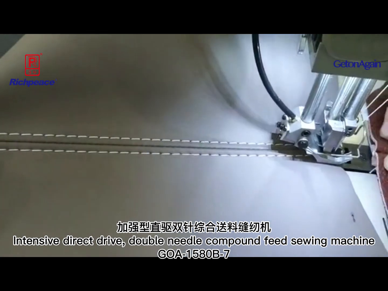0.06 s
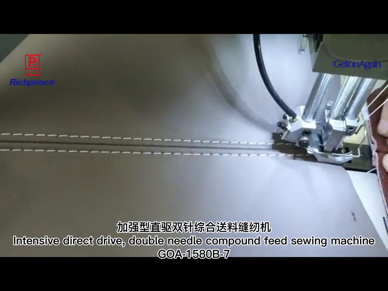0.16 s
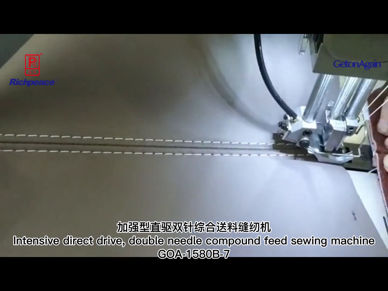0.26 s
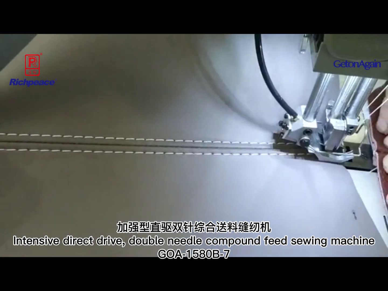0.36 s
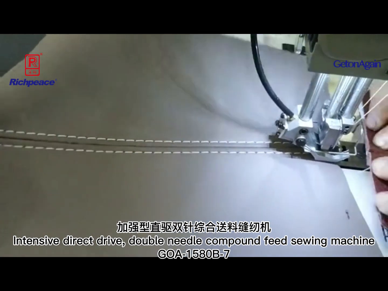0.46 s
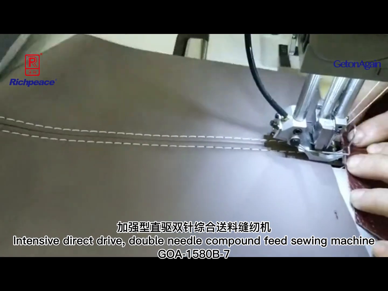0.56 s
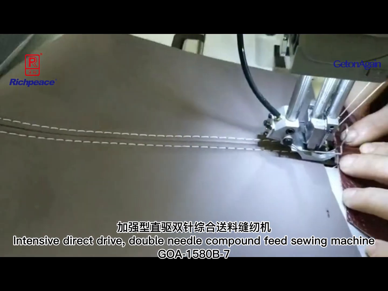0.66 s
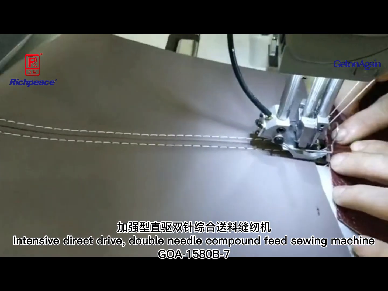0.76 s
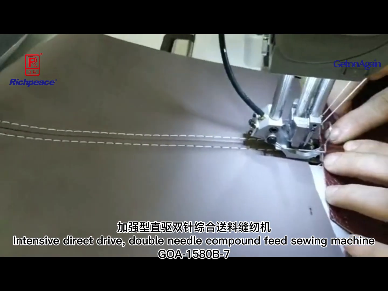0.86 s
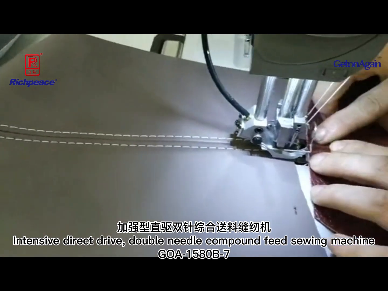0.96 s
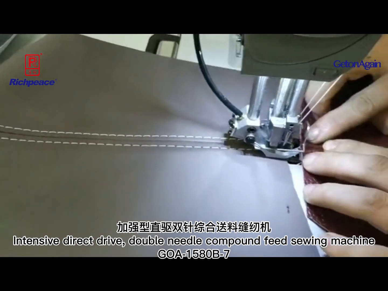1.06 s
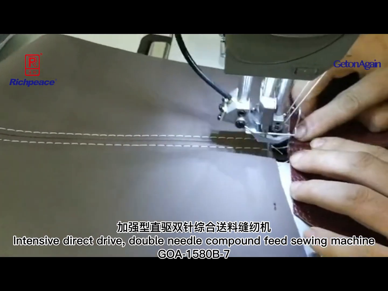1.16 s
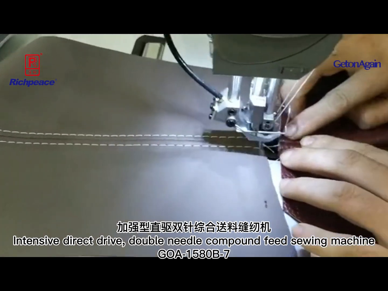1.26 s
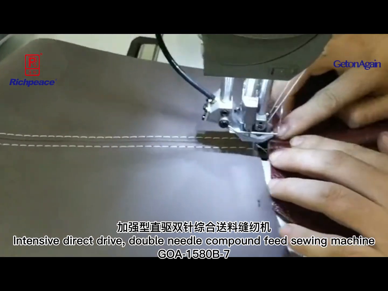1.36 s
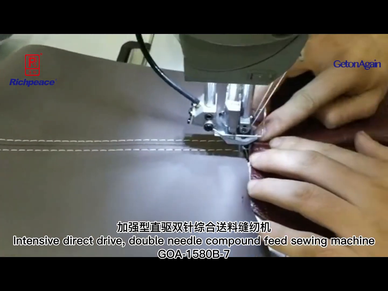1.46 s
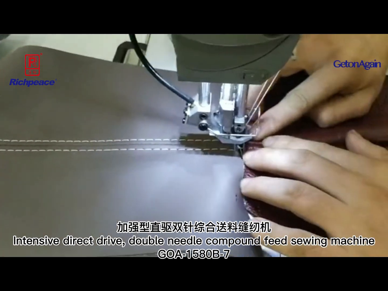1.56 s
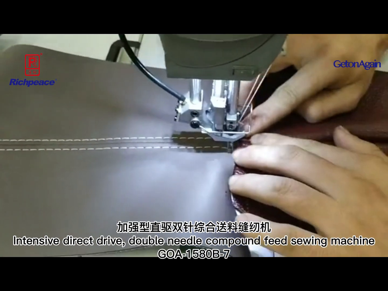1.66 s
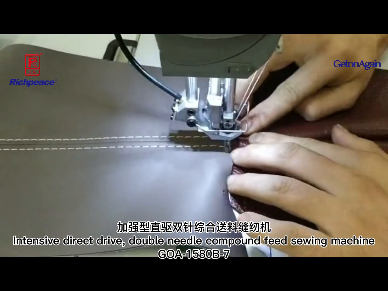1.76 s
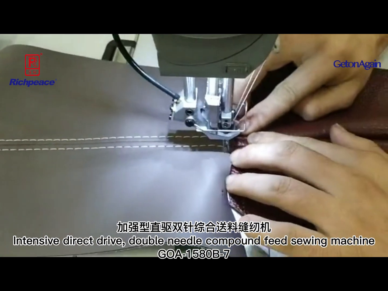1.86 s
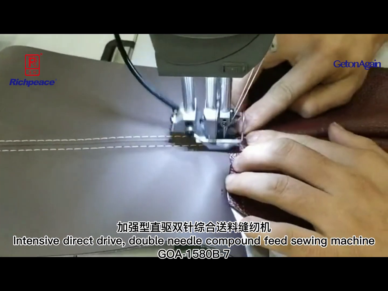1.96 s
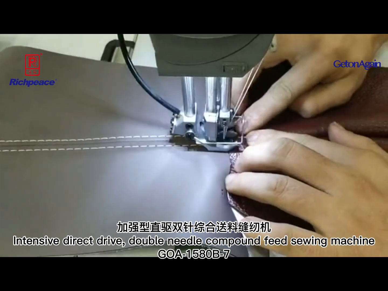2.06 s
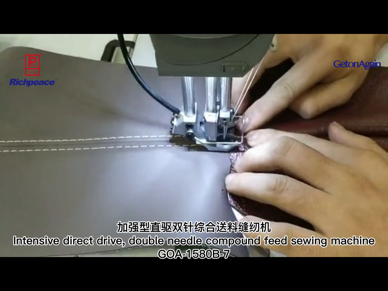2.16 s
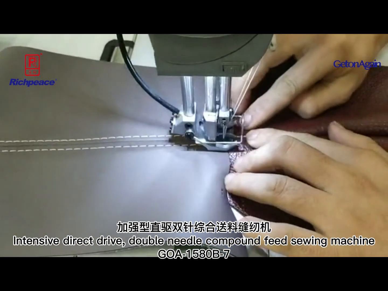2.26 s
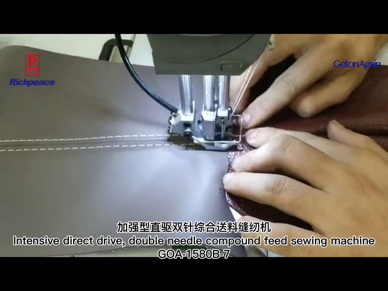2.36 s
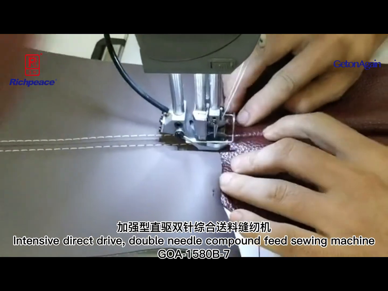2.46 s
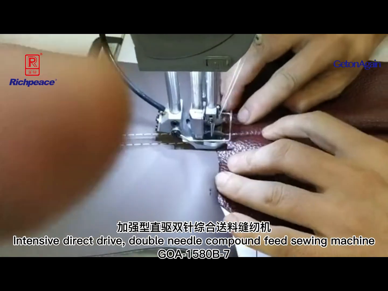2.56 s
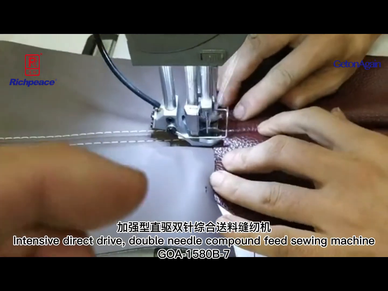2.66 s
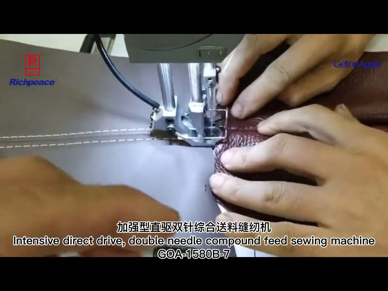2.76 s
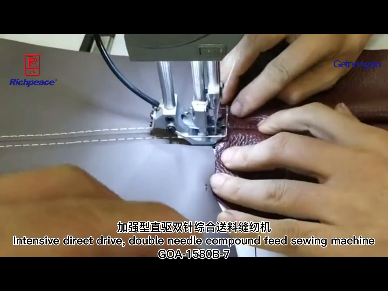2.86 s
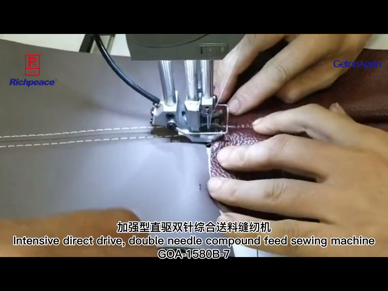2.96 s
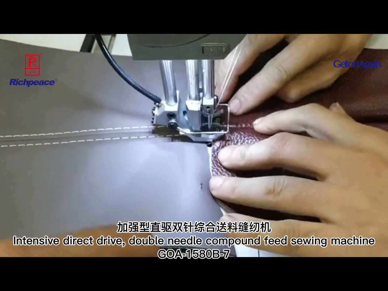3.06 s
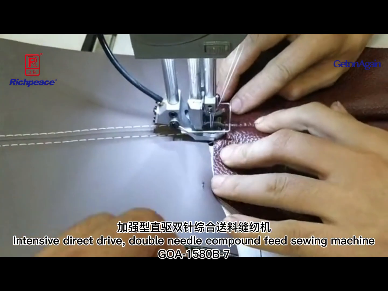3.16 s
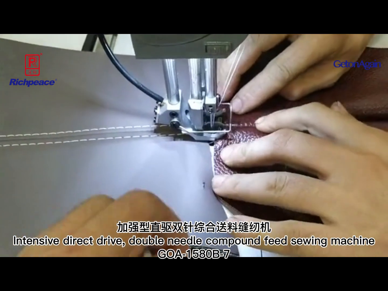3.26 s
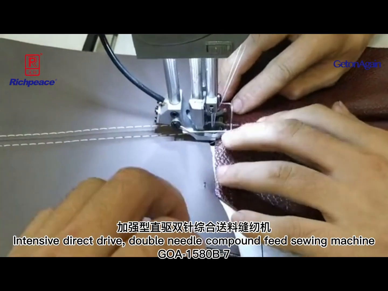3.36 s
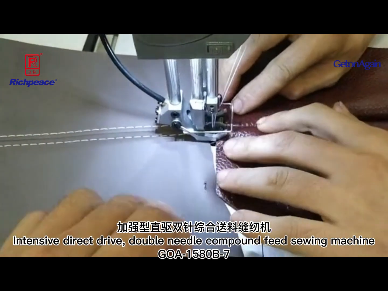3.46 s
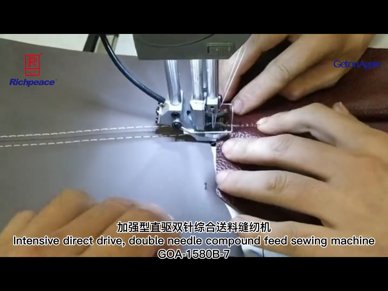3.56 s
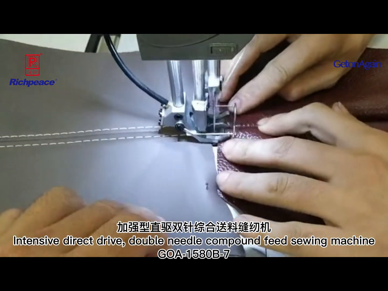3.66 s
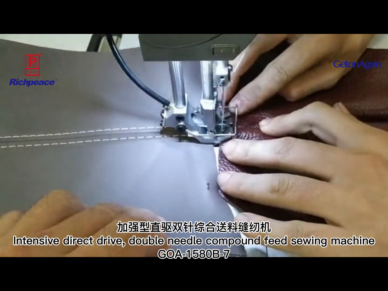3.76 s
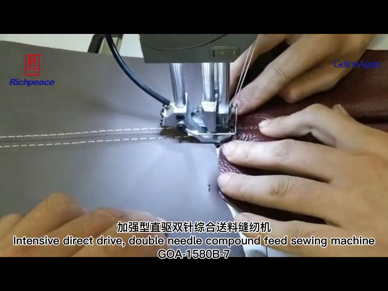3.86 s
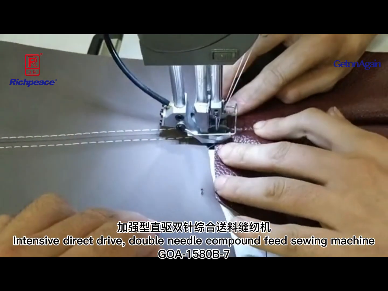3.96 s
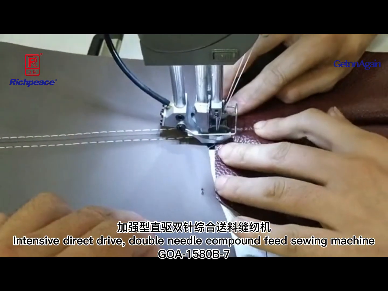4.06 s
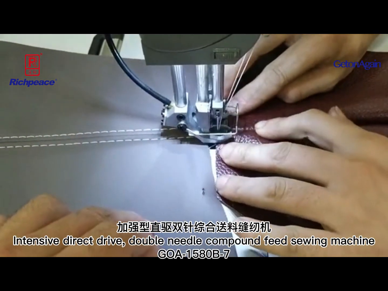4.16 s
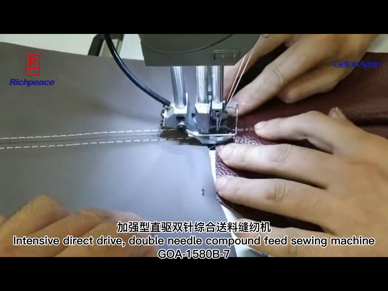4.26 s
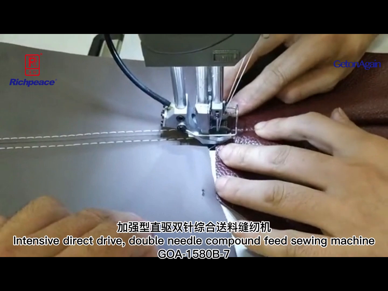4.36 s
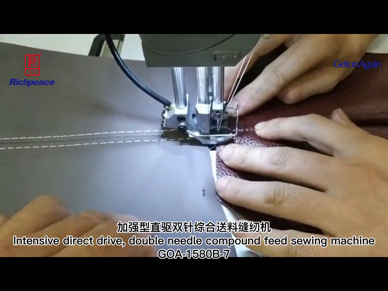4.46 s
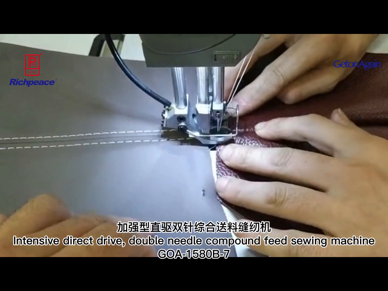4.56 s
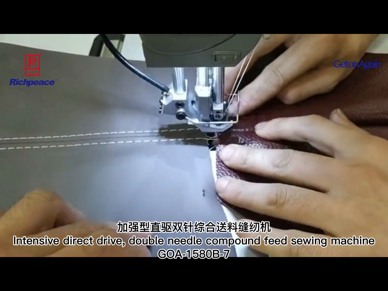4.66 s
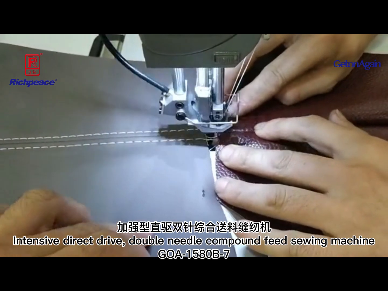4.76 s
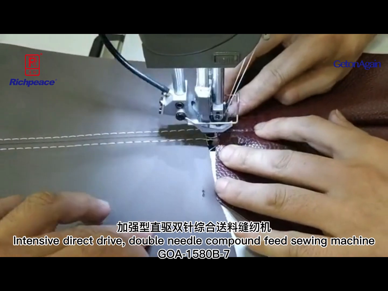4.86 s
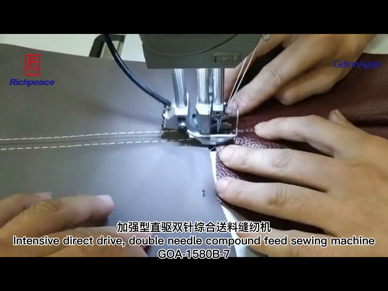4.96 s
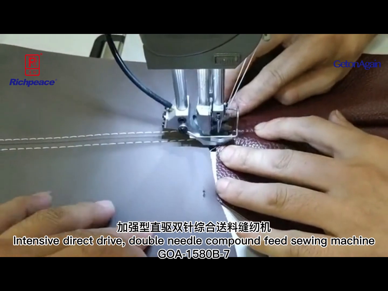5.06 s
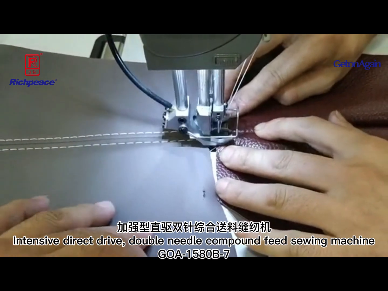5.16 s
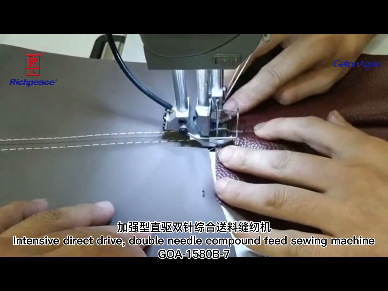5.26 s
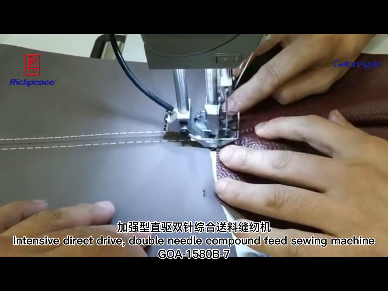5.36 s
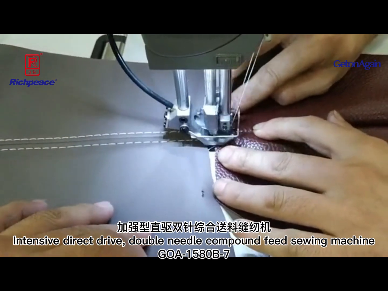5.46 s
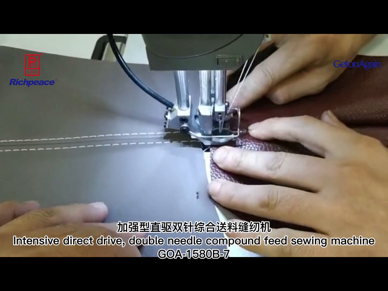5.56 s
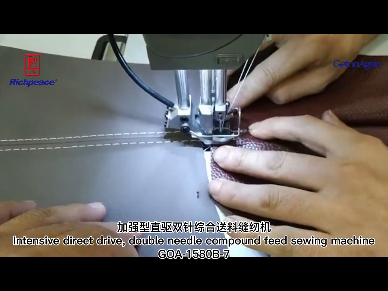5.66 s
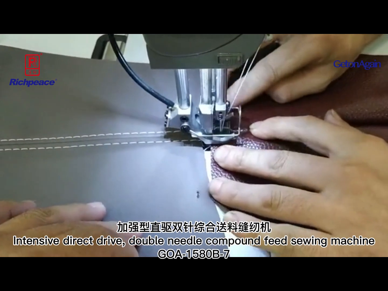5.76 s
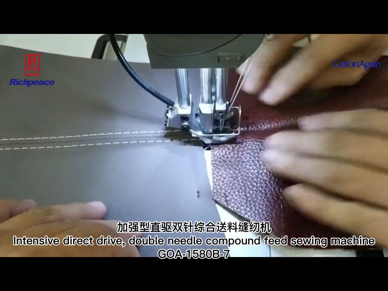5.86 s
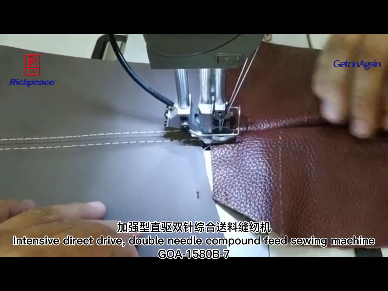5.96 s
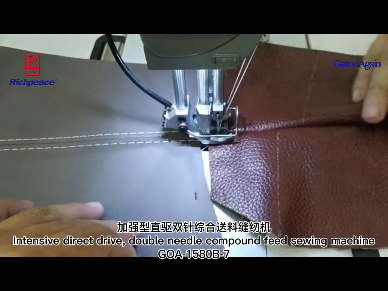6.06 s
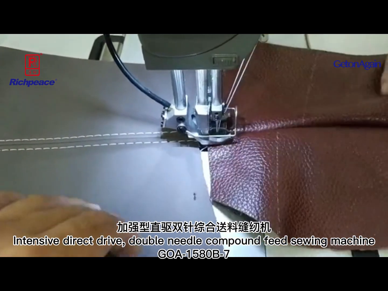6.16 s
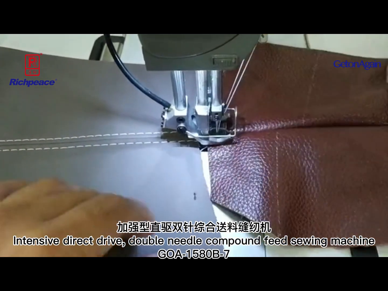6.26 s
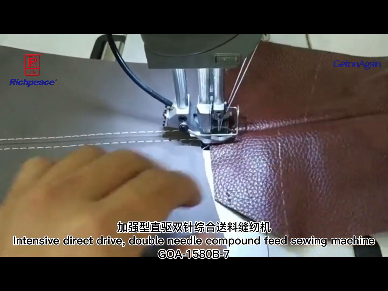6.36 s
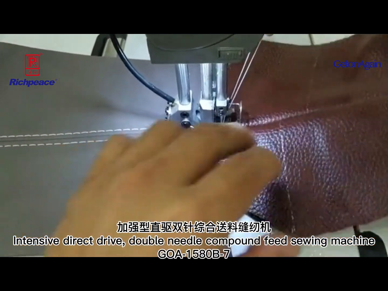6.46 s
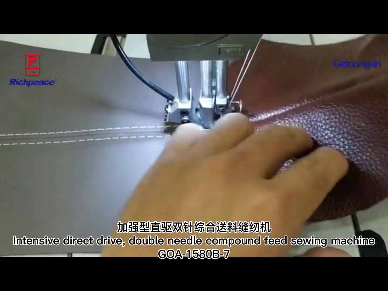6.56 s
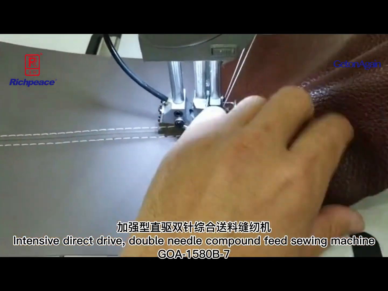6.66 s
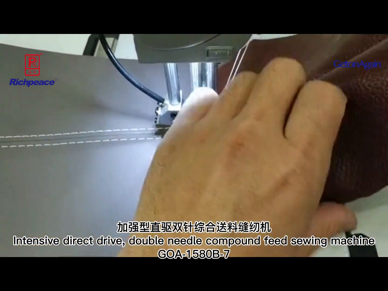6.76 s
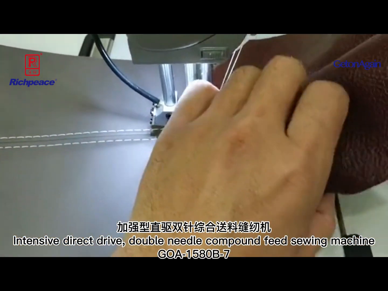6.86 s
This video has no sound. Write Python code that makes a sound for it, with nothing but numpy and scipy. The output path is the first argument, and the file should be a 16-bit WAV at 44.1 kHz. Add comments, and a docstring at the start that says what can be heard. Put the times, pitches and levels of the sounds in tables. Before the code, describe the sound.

Over a low hum, an air cylinder hisses and clacks, raising and dropping a steel foot, while a heavy sewing machine rattles through isolated stitches.

```python
"""A low motor hum and shifting leather come first, then a sewing machine works close up in a workshop.
Twice an air cylinder lifts the presser foot with a hiss and drops it again; three times the machine makes
one stitch: the linkage rattles, thread is drawn, the feed knocks, and the table shudders at each braking.
Hiss, rattle and rubbing are shaped noise, blows are short bursts of noise, thuds and rings are swelling
sine tones, and the hum and a far whine are wavering sine tones. Long noise tails make the echo."""
import sys
import numpy as np
from scipy import signal
from scipy.fft import rfft, irfft
from scipy.io import wavfile

SR = 44100
rng = np.random.default_rng(int(sys.argv[2]) if len(sys.argv) > 2 else 0)


def log_audio(samples):
    """Write samples as a 16-bit WAV file to the path given in sys.argv[1]."""
    # one column per channel
    frames = np.atleast_2d(samples).T
    # limit to full scale, then quantise
    limited = np.clip(frames, -1, 1)
    pcm = np.round(limited * 32767).astype(np.int16)
    wavfile.write(sys.argv[1], SR, pcm)


N = 304092
TIME, HZ = np.arange(N) / SR, np.fft.rfftfreq(N, 1 / SR)  # seconds, Hz
TOP_HZ, EDGE_HZ = 7650, 9555  # upper limit of most sounds, and of the bright ticks and the final filter

# Levels in the tables are relative: the functions may trim them or make them waver.
# The foot lifts: [start_s, air_db, full_flow_s, fall_off_s, thud_db, tick_db,
# delay_to_clack_s, clack_db, top_knock_db]
LIFTS = [(0.974, -25, 0.024, .11, -19.5, -15, .096, -19.5, -35),
         (4.434, -25.5, 0.023, 0.11, -20.5, -22.5, .039, -19.5, -27)]
# The foot drops: [start_s, air_db, full_flow_s, fall_off_s, thud_db, tick_db,
# release_knock_db, landing_knock_db, landing_clack_db]
DROPS = [(1.853, -23.5, 0.063, 0.096, -19, -15.5, -26.5, -18, -23.5),
         (4.815, -24, 0.074, 0.079, -18, -12, -16, -23.5, -17.5)]
# One turn of the shaft a stitch: [start_s, needles_pierce_s, feed_knocks_s, take_up_snaps_s,
# rattle_db, piercing_hiss_db, braking_slope_db_per_s, start_clack_db, piercing_tick_db,
# feed_clack_db, take_up_tick_db, feed_thud_db, shudder_db, stop_clack_db]
STITCHES = [(2.578, 2.580, 2.678, 2.852, -29.5, -35, -65, -18, -28.5, -32, -16, -26, -25, -19),
            (3.543, 3.553, 3.644, 3.812, -28, -31, -30, -29, -16.5, -20, -14.5, -27, -17, -25),
            (5.122, 5.235, 5.310, 5.393, -31, -29.5, -8, -18.5, -45, -32, -18.5, -29, -15, -24)]
# Left-right balance of the machine head: [pitch_hz, left_minus_right_db]
HEAD_SIDE = [(300, 0), (600, -2.5), (1000, 3), (1700, 8.5), (2700, 12), (4000, 4.5), (5500, -2.5),
             (7400, -2)]
# Resonances and one dip of the machine head: [pitch_hz, width_hz, level_db]
HEAD_PEAKS = [(359, 180, 5.5), (496, 100, -3.5), (938, 68, 2.5), (1130, 55, 2), (1830, 100, 1),
              (2208, 310, 5.5), (2720, 160, 2.5), (2953, 99, 5)]
# Colour of the linkage clacks: [pitch_hz, level_db per Hz]
CLACK = [(300, -16.5), (900, -12.5), (1500, -8.5), (2300, 2), (3000, -2.5), (4000, -9.5), (7400, -24.5)]
# Left-right balance of the workshop rumble and the leather: [pitch_hz, left_minus_right_db]
SHOP_SIDE = [(300, 6), (1000, -1), (2300, 9), (4000, 4.5), (7000, -7)]
DROP_TRAVEL_S = .061  # from the release of the foot to its landing
STOP_CLACK_S = .037  # from the take-up snap to the clack as the shaft stops


def amp(db):
    """Decibels to gain."""
    return 10 ** (np.asarray(db) / 20)


def evened(x):
    """Scales to rms 1."""
    return x / np.sqrt(np.mean(x ** 2) + 1e-20)


def read(points, hz):
    """Reads a table on a log-frequency axis."""
    f, value = np.transpose(points)
    return np.interp(np.log(hz + 1), np.log(f + 1), value)


def add(mix, s, sound):
    """Adds a sound into the mix at time s."""
    part = mix[:, max(round(s * SR), 0):][:, :sound.shape[-1]]
    part += sound[..., :part.shape[1]]


def drift(rate):
    """Random wander of rms 1; a higher rate in Hz wanders faster."""
    return evened(irfft(rfft(rng.standard_normal(N)) * np.exp(-(HZ / rate) ** 2), N))


def ports(x):
    """Spectra of two unrelated signals, blended so that left and right share the bass."""
    # How alike left and right are: [pitch_hz, correlation (0 to 1)]
    likeness = [(30, .92), (80, .975), (250, .95), (500, .85), (900, .45), (1500, 0), (8000, 0)]
    a, b = rfft(x)
    alike = np.clip(read(likeness, np.fft.rfftfreq(x.shape[1], 1 / SR)), -1, 1)
    return np.array([a, alike * a + np.sqrt(1 - alike ** 2) * b])


def noise(colour, side, peaks=(), drive=1, parts=0, top=TOP_HZ):
    """Stereo noise shaped in time by drive, plus ringing parts, through a body with colour and resonances."""
    db = read(colour, HZ)
    for hz, width, gain in peaks:
        db = db + gain / (1 + (2 * (HZ - hz) / width) ** 2)
    lean = amp(np.outer([1, -1], read(side, HZ)) / 2)
    lean_rms = np.sqrt(np.mean(lean ** 2, 0))
    body = amp(db) * lean / lean_rms * (HZ < top)
    source = evened(rng.standard_normal((2, N)) * drive) + parts
    return evened(irfft(ports(source) * body, N))


def strikes(rows, body, rise):
    """Each blow cuts a short burst from the body's noise, like a dense cluster of modes ringing briefly."""
    out, t = np.zeros((2, N)), TIME[:SR // 8]
    for s, db, decay in rows:
        shape = (1 - np.exp(-(t / rise) ** 2)) * np.exp(-t / max(decay, .001))
        ring = body[:, round(s * SR):][:, :len(t)] * shape
        add(out, s, amp(db) * evened(ring) * np.sqrt(np.mean(shape ** 2)) / shape.max())
    return out


def swells(rows, overtone, overtone_db, waver):
    """A mode swells and dies away, slightly unsteady in pitch, with one overtone if it is low enough."""
    out, unsteady = np.zeros((2, N)), waver * drift(210)
    for s, db, hz, swell in rows:
        pitch = hz * (1 + unsteady[round(s * SR):][:SR // 3])
        phase = 2 * np.pi * np.cumsum(pitch) / SR
        age = TIME[:len(phase)] / swell
        tone = np.sin(phase) + amp(overtone_db) * np.sin(overtone * phase) * (hz * overtone < TOP_HZ)
        add(out, s, amp(db) * age * np.exp(1 - age) * tone)
    return out


def surge(s, swell):
    """A quick swell to 1 and a slower fade."""
    age = np.maximum(TIME - s, 0) / swell
    return age * np.exp(1 - age)


def after(s, db, parts):
    """Places the parts of one movement at its time and level."""
    return [(s + delay, db + gain, hz, swell) for delay, gain, hz, swell in parts]


def background(waver_db=2.5, wander=.7, swell_db=1.8):
    """Motor hum of sine tones, wavering in level and phase (radians), in the workshop's rumbling noise."""
    # Tones of the motor: [pitch_hz, level_db]
    hum_tones = [(53.8, -50.5), (102.3, -48), (204.6, -64), (732.1, -77.5)]
    # Colour of the workshop rumble: [pitch_hz, level_db per Hz]
    rumble_colour = [(12, -34), (20, 1), (105, -12.5), (125, -19), (291, -19), (433, -32), (729, -30),
                     (867, -33), (934, -30), (1290, -34.5), (1420, -33), (1610, -30), (3750, -36.5),
                     (4920, -41.5), (7500, -43.5), (9750, -71.5), (16500, -120)]
    hum = 0
    for hz, db in hum_tones:
        level = amp(db + waver_db * drift(9))
        hum = hum + level * np.sin(2 * np.pi * hz * TIME + wander * drift(6))
    rumble_level = amp(-47.03 + swell_db * drift(5.8))
    return hum + rumble_level * noise(rumble_colour, SHOP_SIDE)


def leather(level_db=1, grain_db=3):
    """Fine grains of friction swell and fade with each stroke of the hands."""
    # Strokes of the hands over the leather: [middle_s, level_db, half_length_s]
    strokes = [(.16, -55.5, 0.33), (0.438, -55.5, 0.057), (6.438, -55, .005), (6.594, -53.5, .016),
               (6.864, -55.5, 0.01)]
    # Colour of the rubbing: [pitch_hz, level_db per Hz]
    rub_colour = [(290, -28.5), (500, -12), (1110, -5), (1220, -13), (1760, -14), (2080, -0.5), (5040, -10),
                  (7500, -6), (9750, -59), (16500, -120)]
    rub = sum(amp(db + level_db) * np.exp(-((TIME - s) / half) ** 2) for s, db, half in strokes)
    return rub * noise(rub_colour, SHOP_SIDE, drive=amp(grain_db * drift(720)))


def table():
    """The table's modes thud at lifts, drops, starts and feed strokes, at braking and at bumps of the hands."""
    # Soft bumps of hands and leather: [start_s, level_db, pitch_hz, swell_s]
    bumps = [(0.04, -45.5, 258, 0.011), (0.10, -36, 70.4, 0.027), (0.27, -54, 420, 0.024),
             (0.325, -50.5, 1100, 0.011), (0.36, -51, 746, 0.0089), (0.37, -50, 299, 0.022),
             (1.585, -49.5, 755, 0.0036), (2.118, -26, 283.8, 0.013), (2.524, -35.5, 296, 0.0083),
             (2.525, -36, 913, .0048), (3.316, -43, 818, 0.0085), (6.177, -38, 210.7, .0097),
             (6.545, -53.5, 774, .0061), (6.59, -49.5, 708, 0.0058)]
    # The answer to a lift, at the kick and at the top stop: [delay_s, db_re_thud, pitch_hz, swell_s]
    lift_thuds = [(-.002, -1, 201.8, 0.0068), (.001, -1, 344, 0.0027), (.028, -7.5, 64.3, 0.037),
                  (.118, -6, 245, .009), (.132, -10.5, 129, .022)]
    # The answer to a drop, at the release and as the foot seats: [delay_s, db_re_thud, pitch_hz, swell_s]
    drop_thuds = [(-.002, 0.5, 214.5, 0.0059), (.007, 1, 68, 0.0092), (.045, -3.5, 96, .007),
                  (.096, 2.5, 259, 0.002)]
    # The lurch as the motor starts: [delay_s, level_db, pitch_hz, swell_s]
    start_thuds = [(.002, -34, 113, 0.0086), (.070, -35, 101, 0.02)]
    # The thud under the feed knock: [delay_s, db_re_feed_thud, pitch_hz, swell_s]
    feed_thuds = [(.002, 0.5, 187, .0075), (.003, -0.5, 292, .018)]
    # The shudder as the motor brakes: [delay_from_take_up_s, db_re_shudder, pitch_hz, swell_s]
    shudder = [(-.082, -3, 75.7, 0.0095), (-.074, -1.5, 117.6, .016), (-.036, -4, 97, .011),
               (.008, -14.5, 87.5, .014)]
    thuds = []
    for moves, answer in (LIFTS, lift_thuds), (DROPS, drop_thuds):
        for s, _, _, _, thud_db, *_ in moves:
            thuds += after(s, thud_db, answer)
    for start, _, feed, take_up, *_, feed_db, shudder_db, _ in STITCHES:
        thuds += after(start, 0, start_thuds)
        thuds += after(feed, feed_db, feed_thuds)
        thuds += after(take_up, shudder_db, shudder)
    machine_thuds = swells(thuds, overtone=1.36, overtone_db=-11.0, waver=0.13)
    return machine_thuds + swells(bumps, overtone=1.36, overtone_db=-12.0, waver=0.1)


def whine(waver=0.027):
    """A far machine whines briefly: several tones whose pitches waver."""
    # Rise and fall of the whine: [time_s, level_db]
    whine_levels = [(0.60, -82), (0.67, -67.5), (0.88, -62.5), (0.96, -65)]
    # Its tones: [pitch_hz, level_db]
    partials = [(760, 0), (925, 0.5), (1384, -2), (2300, -1.5), (3700, -3)]
    s, db = np.transpose(whine_levels)
    tones = 0
    for hz, gain in partials:
        pitch = hz * (1 + waver * drift(120))
        tones = tones + amp(gain) * np.sin(2 * np.pi * np.cumsum(pitch) / SR)
    return amp(np.interp(TIME, s, db, left=-140, right=-140)) * tones


def clatter(rate, width, count=120):
    """Loose steel parts ring when knocked at random (hits per s each), each with its own note and place."""
    out, r = np.zeros((2, N)), np.exp(-np.pi * width / SR)  # width of each resonance in Hz
    for hz in np.linspace(400, 7500, count) + rng.uniform(-26.5, 30, count):
        hits = np.zeros(N)
        at = rng.integers(0, N, round(rate * N / SR))
        hits[at] = rng.standard_normal(len(at))
        turn, place = 2 * np.pi * hz / SR, rng.uniform(0, 2 * np.pi)
        ring = signal.lfilter([np.sin(turn)], [1, -2 * r * np.cos(turn), r * r], hits + 1e-12)
        out += np.outer([np.cos(place), np.sin(place)], ring)
    return evened(out)


def chatter(rate=130, spread_db=5.0, decay=0.0037):
    """Loose joints tap at random (rate per s), some harder than others; each tap is a fading noise burst."""
    hardness = amp(spread_db * np.minimum(rng.exponential(1, N), 3))
    hits = hardness * (rng.random(N) < rate / SR)
    taps = signal.lfilter([1], [1, -np.exp(-1 / (max(decay, .0005) * SR))], hits)
    return noise(CLACK, HEAD_SIDE, HEAD_PEAKS, drive=taps)


def air(rows, colour, parts, rise, flutter_db, lead=0.014, leak_db=-13, taps_db=-10):
    """The valve leaks, then snaps open; the jet holds and shakes the foot, then fades as pressure evens out."""
    # Left-right balance of the air: [pitch_hz, left_minus_right_db]
    air_side = [(300, 0.5), (900, 0.5), (1700, 4.5), (2300, 9.5), (3000, 4), (4200, 2.5), (5200, -4),
                (6300, -6), (7400, -17.5)]
    # Resonances of the cylinder and its exhaust: [pitch_hz, width_hz, level_db]
    air_peaks = [(325, 500, 7.5), (1638, 74, 3), (2164, 150, 8), (2610, 47, 3), (3072, 130, -1),
                 (7336, 400, 13.5)]
    flow = np.zeros(N)
    for s, db, hold, fall, *_ in rows:
        age = np.maximum(TIME - s, 0)
        leak = amp(leak_db) * np.clip((TIME - s) / lead + 1, 0, 1)
        opening = 1 - np.exp(-age / rise)
        fade = np.exp(-np.maximum(age - hold, 0) / fall)
        flow += amp(db) * (leak + opening) * fade
    hiss = noise(colour, air_side, air_peaks, parts=parts)
    return flow * amp(flutter_db * drift(82)) * (hiss + amp(taps_db) * chatter())


def impacts(kick_db=-27, pierce_clack_db=4.5):
    """Lifts, drops and stitches play sequences of plate knocks, head clacks and bright ticks, all noise bursts."""
    # Hands and work tap the needle plate: [start_s, level_db, decay_s]
    plate_taps = [(2.097, -24, 0.0043), (2.527, -38, .0074), (6.179, -37, 0.013), (6.591, -52, .0073)]
    # The linkage settles at rest: [start_s, level_db, decay_s]
    settles = [(3.318, -31, .004)]
    # Thread flicks against its guides before, between and after the stitches: [start_s, level_db, decay_s]
    flicks = [(1.4936, -31, 0.00062), (1.531, -41, 0.0018), (3.284, -40.5, 0.0013), (6.4345, -45.5, 0.0015)]
    # Colour of the plate knocks: [pitch_hz, level_db per Hz]
    knock_colour = [(150, -5), (330, -0.5), (520, -11), (750, -5), (1000, 0.5), (1250, -1.5), (1500, -6.5),
                    (2100, -10.5), (3500, -21), (7400, -27.5)]
    # Colour of the bright ticks: [pitch_hz, level_db per Hz]
    tick_colour = [(2000, -29), (5000, -16.5), (7000, -11.5), (7600, -0.5), (8150, 6), (8500, -31),
                   (9200, -37.5)]
    # Left-right balance of the ticks: [pitch_hz, left_minus_right_db]
    tick_side = [(2500, -1), (6000, -21), (8000, -41)]
    # How fast the blows die, in seconds
    feed_decay, foot_decay, release_decay, stop_decay = 0.0092, .005, 0.032, 0.026
    clack_decay, tick_decay = 0.0072, 0.002
    lift_travel_s = 0.14  # from the kick to the top stop
    stop_s = .029  # from the take-up snap to the knock as the shaft stops
    slack_s, slack_db = .038, -20  # the play in the linkage closes after the drive engages
    feed_knock_db, stop_knock_db = -11.5, -26

    knocks, clacks, ticks = list(plate_taps), list(settles), list(flicks)
    for s, *_, tick_db, clack_s, clack_db, top_db in LIFTS:
        knocks += [(s, kick_db, foot_decay), (s + lift_travel_s, top_db, foot_decay)]
        clacks += [(s + clack_s, clack_db, clack_decay)]
        ticks += [(s, tick_db, tick_decay)]
    for s, *_, tick_db, release_db, land_db, clack_db in DROPS:
        landing = s + DROP_TRAVEL_S
        knocks += [(s, release_db, release_decay), (landing, land_db, foot_decay)]
        clacks += [(landing, clack_db, clack_decay)]
        ticks += [(s, tick_db, tick_decay)]
    for row in STITCHES:
        start, pierce, feed, take_up, _, hiss_db, _, start_db, pierce_db, feed_db, take_up_db, *_, stop_db = row
        knocks += [(feed, feed_knock_db, feed_decay), (take_up + stop_s, stop_knock_db, stop_decay)]
        joints = [(start, start_db), (start + slack_s, slack_db), (pierce, hiss_db + pierce_clack_db),
                  (feed, feed_db), (take_up + STOP_CLACK_S, stop_db)]
        clacks += [(s, db, clack_decay) for s, db in joints]
        ticks += [(pierce, pierce_db, tick_decay), (take_up, take_up_db, tick_decay)]
    plate = amp(-4.0) * strikes(knocks, noise(knock_colour, HEAD_SIDE, HEAD_PEAKS), rise=0.0018)
    head = amp(-5.0) * strikes(clacks, noise(CLACK, HEAD_SIDE, HEAD_PEAKS), rise=0.0013)
    bright = amp(-6.0) * strikes(ticks, noise(tick_colour, tick_side, top=EDGE_HZ), rise=0.0046)
    return plate + head, bright


def foot():
    """The steel foot rings as it lands, then squeaks as it seats: short swelling tones."""
    # Rings and squeaks: [delay_after_landing_s, level_db, pitch_hz, swell_s]
    foot_rings = [(.003, -21.5, 806, 0.0058), (.048, -21.5, 6330, .0066), (.052, -27, 5850, .006)]
    rings = []
    for s, *_ in DROPS:
        rings += after(s + DROP_TRAVEL_S, 0, foot_rings)
    left_right_db = [[-3], [2]]
    return swells(rings, overtone=1.9, overtone_db=-13, waver=0.026) * amp(left_right_db)


def stitching(parts, rattle_db=-0.74, chatter_db=0.5, grain_db=3, taps_db=-6):
    """Joints rattle, change level with braking and jolt at the stop; thread hisses as it is pulled."""
    # Colour of the linkage rattle: [pitch_hz, level_db per Hz]
    linkage_colour = [(88, -17), (150, -1.5), (189, -18), (278, 0.5), (508, -24.5), (574, -10.5),
                      (724, -11.5), (832, -15.5), (1520, -15), (2200, -13), (2690, -16.5), (3340, -24),
                      (5300, -26.5), (6000, -27.5), (7800, -56.5), (13200, -120)]
    # Colour of the thread hiss: [pitch_hz, level_db per Hz]
    thread_colour = [(2500, -13.5), (4000, -6.5), (5400, -20.5), (6500, 0), (7400, -3)]
    # Left-right balance of the thread: [pitch_hz, left_minus_right_db]
    thread_side = [(3000, 1), (5000, -0.5), (7000, -19)]
    edge_s, run_out_s = 0.0042, 0.0522  # fade at both ends; running on after the take-up
    jolt_db, jolt_s = -5, 0.021
    running_db, pay_out_s = -42, 0.041  # thread running until the feed knock; its fade after it
    snatch_db, pierce_s = -36, 0.0041
    draw_db, draw_lead_s, draw_s = -36, 0.079, 0.026  # drawn tight ahead of the take-up

    joints = noise(linkage_colour, HEAD_SIDE, HEAD_PEAKS, amp(grain_db * drift(1400)), parts)
    rattle = amp(chatter_db * drift(70)) * joints + amp(taps_db) * chatter()
    thread = noise(thread_colour, thread_side, drive=amp(grain_db * drift(900)))
    shake, pull = np.zeros((2, N))
    for start, pierce, feed, take_up, db, hiss_db, slope, *_ in STITCHES:
        turning = np.clip(np.minimum(TIME - start, take_up + run_out_s - TIME) / edge_s, 0, 1)
        speed = amp(slope * np.clip(TIME - feed, 0, take_up - feed))
        jolt = amp(jolt_db) * np.exp(-((TIME - take_up - STOP_CLACK_S) / jolt_s) ** 2)
        shake += turning * amp(db + rattle_db) * (speed + jolt)
        snatched = amp(snatch_db) * surge(start, pierce_s)
        pierced = amp(hiss_db) * surge(pierce, pierce_s)
        drawn = amp(draw_db) * surge(take_up - draw_lead_s, draw_s)
        running = amp(running_db) * np.clip((feed - TIME) / pay_out_s + 1, 0, 1)
        pull += turning * (running + snatched + pierced + drawn)
    return shake * rattle + pull * thread


def room(x, delay=0.0038):
    """Diffuse echoes: a tail of noise, faded in over delay seconds, each band dying at its own speed."""
    # Time for the echo to fall by 60 dB: [pitch_hz, fall_s]
    fall_times = [(60, 1.95), (150, 0.5), (350, 1.46), (1000, 1.78), (2300, 1.81), (4000, 1.17),
                  (7500, 1.33)]
    # Strength of the echo: [pitch_hz, level_db]
    echo_levels = [(60, -11), (120, -6), (165, -2.5), (260, -9.5), (360, -2.5), (540, -9.5), (750, -12),
                   (1050, -4.5), (1500, -7.5), (2300, -7), (4000, -4), (7500, -13)]
    hz, t, z = signal.stft(irfft(ports(rng.standard_normal((2, 2 * SR)))), SR, nperseg=512)
    t60 = read(fall_times, hz)[:, None]
    fade = np.exp(-np.log(1000) * t / t60)
    even_energy = np.sqrt(2 * np.log(1000) / (t60 * SR))  # long and short tails get equal energy
    z = z * amp(read(echo_levels, hz)[:, None]) * fade * even_energy
    tail = signal.istft(z, SR, nperseg=512)[1]
    tail = tail * np.minimum(TIME[:tail.shape[1]] / delay, 1)
    return signal.fftconvolve(x, tail, axes=1)[:, :N]


def scene():
    """The machine and its echo, with dry ticks, leather, the far whine and the workshop."""
    # Colour of the air as the foot lifts: [pitch_hz, level_db per Hz]
    lift_colour = [(71, -37.5), (120, 8), (195, -20.5), (232, -29.5), (271, -5), (345, 0), (541, -26),
                   (677, -10.5), (974, -19.5), (1160, -11.5), (1350, -18.5), (2160, -6.5), (2850, -9.5),
                   (7120, -12), (7500, -21.5), (9750, -34), (16500, -120)]
    # Colour of the air as the foot drops: [pitch_hz, level_db per Hz]
    drop_colour = [(71, -44.5), (120, 5), (232, -20.5), (311, -1.5), (522, -19.5), (805, -7.5),
                   (1030, -28.5), (1120, -24), (1450, -11.5), (2230, -7), (2700, -4.5), (2900, -10),
                   (4090, -10), (6420, -9.5), (7500, -16), (9750, -25.5), (16500, -120)]
    blows, ticks = impacts()
    parts = clatter(rate=45, width=34)
    shaken, driven = amp(1) * parts, amp(5) * parts  # by the air, by the shaft
    lift_air = air(LIFTS, lift_colour, shaken, rise=0.008, flutter_db=0.8)
    drop_air = air(DROPS, drop_colour, shaken, rise=0.0051, flutter_db=-0.5)
    machine = lift_air + drop_air + stitching(driven) + blows + table() + foot()
    return machine + room(machine) + ticks + leather() + whine() + background()


def record(dry):
    """A steep low-pass filter removes everything well above EDGE_HZ."""
    low_pass = signal.firwin(511, EDGE_HZ, window=("kaiser", 9), fs=SR)
    return signal.oaconvolve(dry, low_pass[None], "same")


dry = scene()
out = record(dry)
log_audio(out)
```